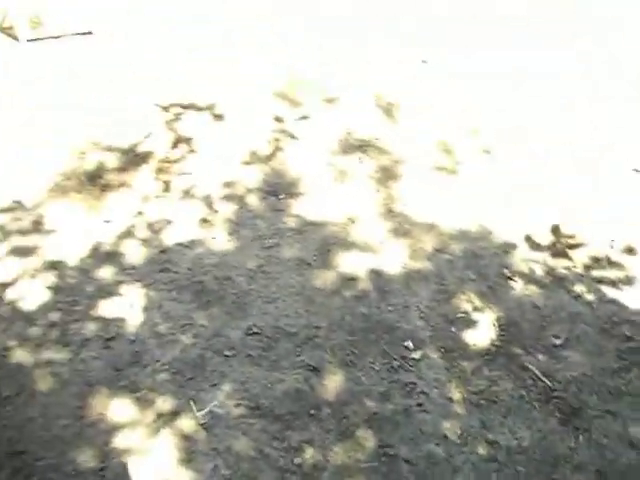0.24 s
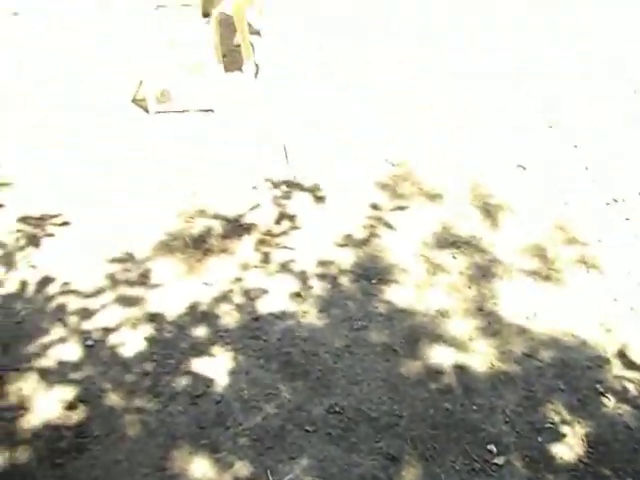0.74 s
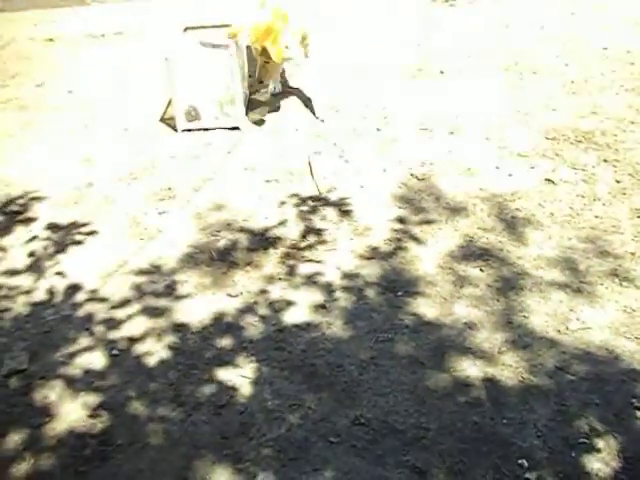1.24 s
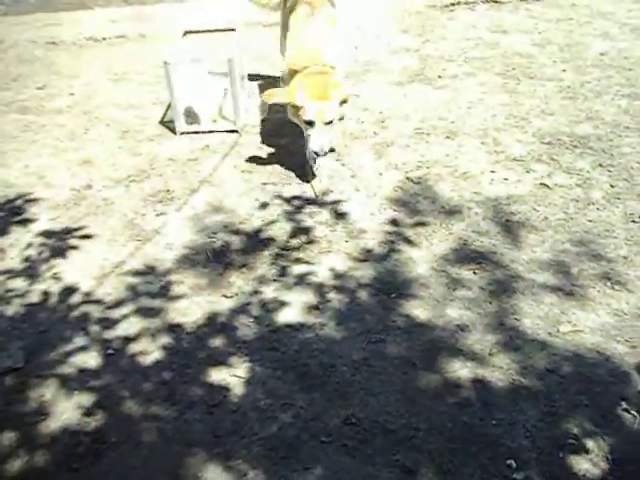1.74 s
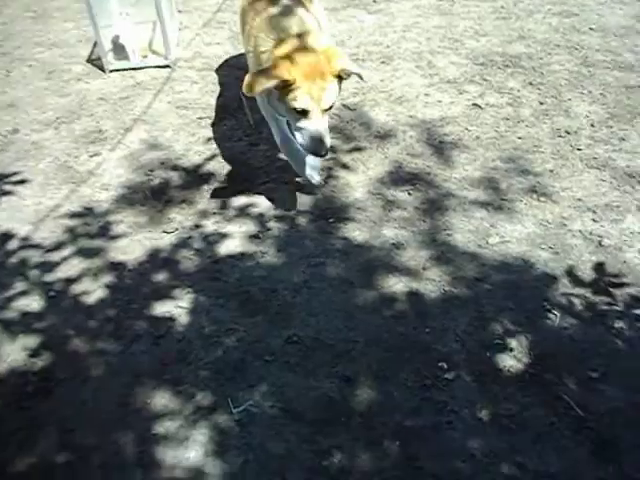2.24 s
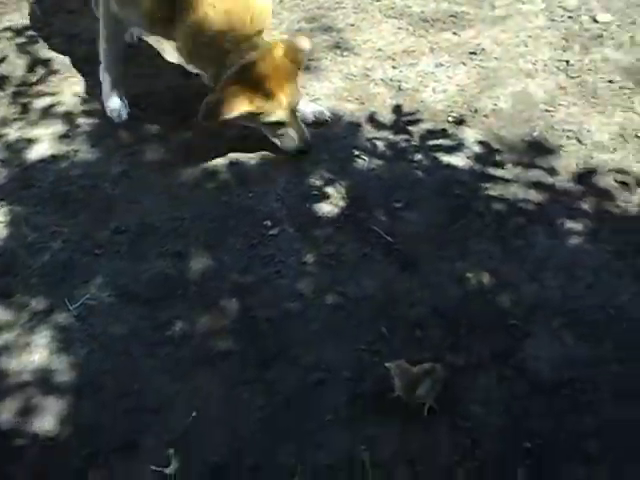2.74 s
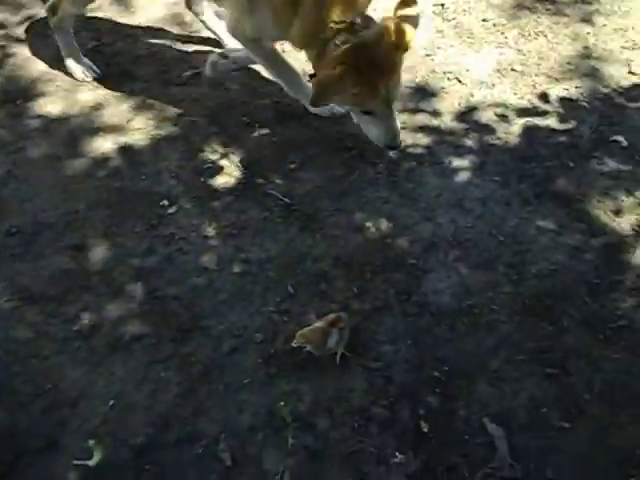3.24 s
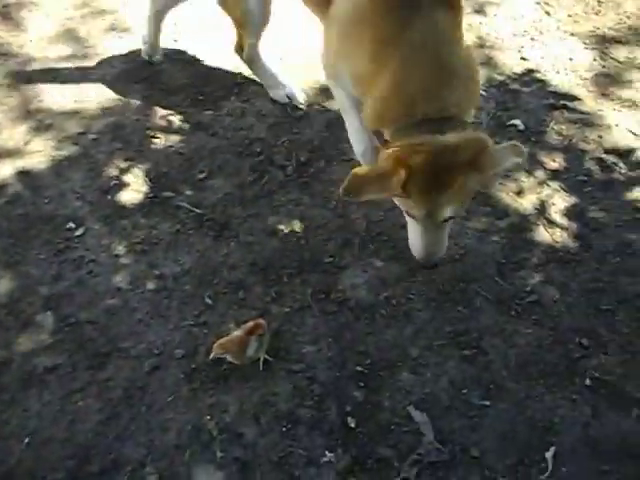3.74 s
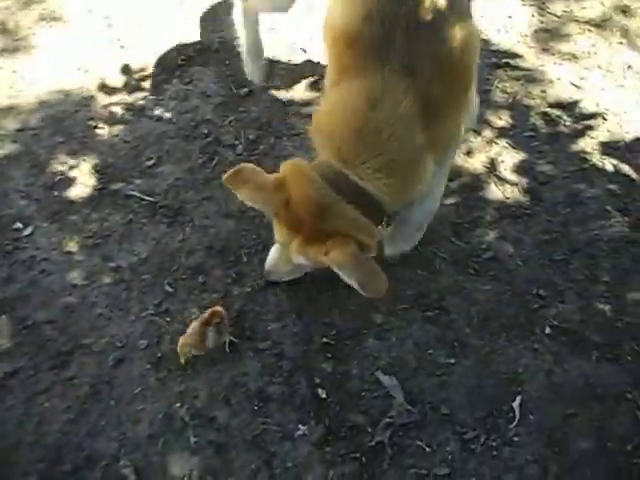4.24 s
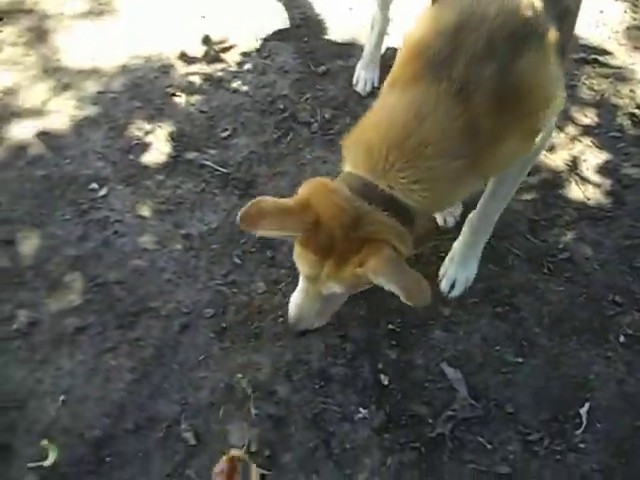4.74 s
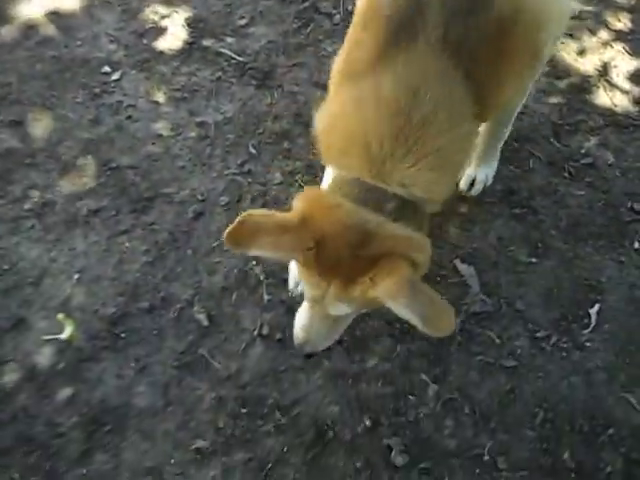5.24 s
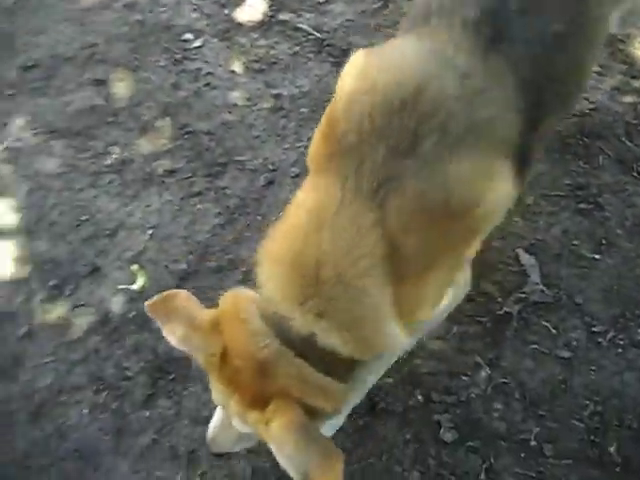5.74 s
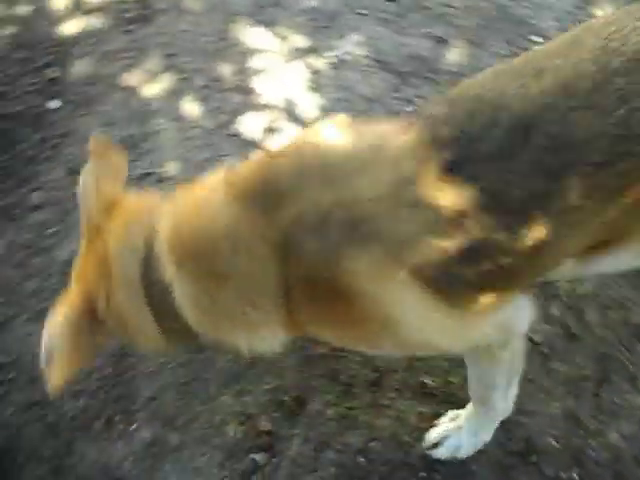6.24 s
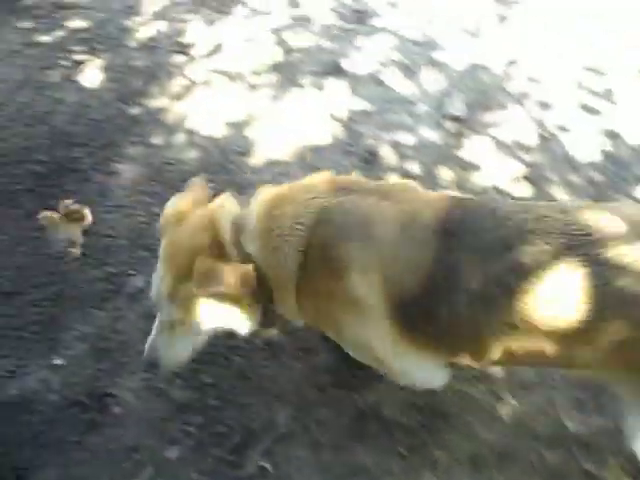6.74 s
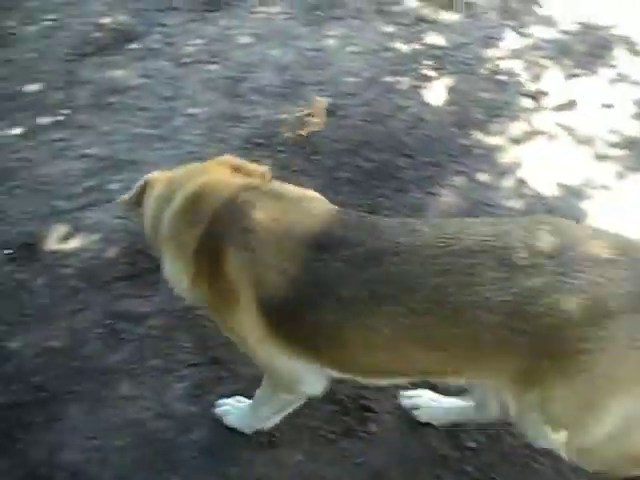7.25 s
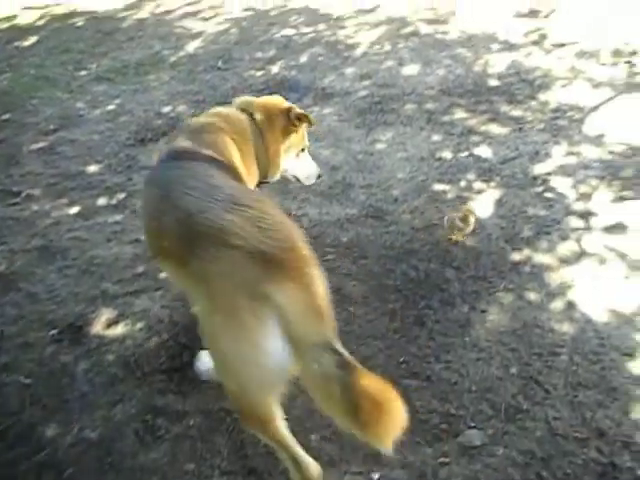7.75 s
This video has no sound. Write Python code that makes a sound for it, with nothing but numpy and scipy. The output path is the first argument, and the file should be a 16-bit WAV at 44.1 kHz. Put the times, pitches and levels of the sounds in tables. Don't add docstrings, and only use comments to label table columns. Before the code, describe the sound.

Piercing falling chick peeps in an open yard, overloaded at their loudest, with breathy hiss, leaf rustles and increasingly heavy wind buffeting.

```python
import sys
import numpy as np
from scipy import signal
from scipy.fft import rfft, irfft
from scipy.io import wavfile
from scipy.ndimage import uniform_filter1d

SR = 44100
rng = np.random.default_rng(int(sys.argv[2]) if len(sys.argv) > 2 else 0)


def output_pcm(signal):
    pcm = np.clip(np.atleast_2d(signal).T, -1, 1) * 32767
    wavfile.write(sys.argv[1], SR, np.round(pcm).astype(np.int16))


def voltage_ratio(decibels):
    exponent = np.asarray(decibels, float) / 20
    return 10 ** exponent


N = 352359


def evened(x):
    return x / np.sqrt(np.mean(x ** 2) + 1e-20)


def read(points, hz):
    f, value = np.transpose(points)
    return np.interp(np.log(hz + 1), np.log(f + 1), value)


def add(mix, s, sound):
    part = mix[round(s * SR):][:len(sound)]
    part += sound[:len(part)]


def follow(points):
    return np.interp(np.arange(N) / SR, *np.transpose(points))


def noise(spectrum, size, patchy_db):
    hz = np.fft.rfftfreq(size, 1 / SR)
    a, b, patches = rng.standard_normal((4 * N // size + 5, len(hz), 3)).T
    patches = uniform_filter1d(patches, size=9, axis=0)
    patches = evened(uniform_filter1d(patches, size=9, axis=1))
    z = (a + 1j * b) * voltage_ratio(read(spectrum, hz)[:, None] + patchy_db * patches)
    return evened(signal.istft(z, nperseg=size, noverlap=3 * size // 4)[1][:N])


def yard(x):
    # f/Hz, reverberation time/s
    decay_times = [(2000, 0.21), (3500, 0.33), (5000, 0.13), (8000, 0.27)]
    taps = np.zeros(SR // 2)
    at = np.arange(300, len(taps) - 20, 20)
    taps[at + rng.integers(0, 20, len(at))] = rng.choice([-1., 1.], len(at))
    hz, t, z = signal.stft(taps, SR, nperseg=256)
    decay = voltage_ratio(-60 * t / read(decay_times, hz)[:, None])
    tail = signal.istft(z * decay, SR, nperseg=256)[1]
    return signal.fftconvolve(x, tail / np.linalg.norm(tail))[:N]


def scatter(x):
    t = np.arange(3500) / SR
    dull = signal.lfilter([1], [1, -.45], rng.standard_normal(len(t)))
    taps = dull * voltage_ratio(-60 * t / 0.16) * np.clip(t / .011 - .5, 0, 1) ** 2
    return signal.oaconvolve(x, taps / np.linalg.norm(taps))[:N]


def hiss():
    # f/Hz, level per Hz/dB
    floor_spectrum = [(88, -54), (150, -25.5), (197, -9.5), (363, -13), (998, -15.5), (1840, -22),
                      (2840, -21), (3790, -11), (4630, -18), (5250, -13), (11200, -35), (14600, -75),
                      (22000, -120)]
    return voltage_ratio(-50) * noise(floor_spectrum, size=1024, patchy_db=1.5)


def brood():
    # t/s, level/dB
    murmur = [(0, -38), (.35, -67), (.7, -48), (1.0, -45.5), (1.5, -44), (1.95, -40.5), (2.3, -49.5),
              (2.65, -59), (3.03, -61), (3.4, -51), (3.83, -58), (4.1, -46.5), (4.5, -48.5), (5.2, -45),
              (6, -49.5), (7, -40.5), (7.99, -47.5)]
    out, t = np.zeros(N), np.linspace(0, 1, num=6000)
    for s, pitch, size in rng.random((800, 3)):
        hz = (4300 + 1500 * pitch) * (1 - 0.49 * t ** 2.3)
        peep = np.sin(2 * np.pi * np.cumsum(hz) / SR) * np.sin(np.pi * t)
        add(out, s * N / SR, voltage_ratio(5 * size) * peep)
    return voltage_ratio(follow(murmur)) * evened(yard(out))


def insect():
    # f/Hz, level/dB
    thin_tones = [
        (10790, -62),
        (11215, -82),
    ]
    t = np.arange(N) / SR
    dashes = uniform_filter1d((t * 30.5 % 1 < .6) * 1., size=120)
    return dashes * sum(voltage_ratio(db) * np.sin(2 * np.pi * hz * t) for hz, db in thin_tones)


def rustle():
    # t/s,
    # length/s, level/dB
    stirs = [(.55, 0.2, -59), (0.725, 0.11, -41), (0.838, 0.05, -39), (1.206, 0.55, -52.5),
             (1.86, 0.13, -51), (2.328, .1, -58), (2.718, .08, -54), (3.093, 0.12, -57),
             (3.528, 0.088, -60), (5.523, 0.11, -60), (4.013, 0.21, -52), (4.292, 0.055, -46),
             (4.863, 0.028, -51.5), (6.297, 0.32, -42.5), (6.487, 0.091, -34), (6.68, 0.55, -42)]
    # f/Hz, level/dB
    leaves = [(2500, -19), (4000, -14.5), (6300, -0.5), (7200, -13), (10000, -19.5), (11500, -33)]
    t, level = np.arange(N) / SR, np.zeros(N)
    for s, length, db in stirs:
        u = np.maximum(t - s, 0) / length
        level += voltage_ratio(db) * np.minimum(u / 0.12, 1) * np.exp(-u ** 2)
    crackle = evened(uniform_filter1d(rng.standard_normal(N), size=200))
    return level * voltage_ratio(2.5 * crackle) * noise(leaves, size=256, patchy_db=3.0)


def gusts():
    # centre t/s, half width/s, rumble level/dB, flutter over rumble/dB
    gust_rows = [(0.161, 0.61, -27.5, -30), (.64, 0.088, -13.5, -28), (0.992, 0.037, -5, -26),
                 (1.278, 0.12, -16, -24), (1.48, 0.063, -18, -23), (1.7, 0.096, -14.5, -27),
                 (2.0, 0.18, -28.5, -21), (2.65, 0.4, -29, -28), (3.08, 0.098, -22, -18.5),
                 (3.25, 0.053, -20.5, -19), (3.62, 0.23, -26, -25), (4.55, 0.081, -28, -27),
                 (4.781, 0.11, -20, -24.5), (5.222, 0.018, -17, -30), (5.33, 0.11, -16.5, -22.5),
                 (5.538, 0.072, -14, -22), (6.07, 0.036, -14.5, -30), (6.226, 0.031, -9.5, -16),
                 (6.412, 0.078, -11.5, -19.5), (6.648, 0.029, -13.5, -5.5), (6.732, 0.02, -1, -4.5),
                 (6.871, 0.099, -9, -5.5), (7.028, 0.094, -4, 4), (7.2, 0.075, -7, -3),
                 (7.352, 0.029, -12.5, 1), (7.477, 0.065, -8.5, -5.5), (7.97, 0.11, -23, -38)]
    calm_db, calm_flutter_db = -37.5, -57.5
    t = np.arange(0, N, 100) / SR
    s, width, db, over_db = np.transpose(gust_rows)[:, :, None]
    bell = np.exp(-((t - s) / width) ** 2)
    gains = []
    for rest_db, level_db in [(calm_db, db), (calm_flutter_db, db + over_db)]:
        power = voltage_ratio(2 * rest_db) + (voltage_ratio(2 * level_db) * bell).sum(axis=0)
        gains.append(np.interp(np.arange(N) / SR, t, np.sqrt(power)))
    return gains


def wind():
    # f/Hz, level/dB
    rumble_spectrum = [(12, 6.5), (25, 10), (45, 0.5), (80, -9), (120, -18.5), (200, -50.5), (350, -100)]
    # f/Hz, level/dB
    flutter_spectrum = [(50, -7), (100, 2.5), (220, -5.5), (350, -15.5), (600, -27), (1000, -40.5),
                        (2500, -77)]
    # t/s, signed push, length/s
    pushes = [(0.979, -1.1, 0.0095), (1.688, 1, 0.0026), (3.579, 0.45, 0.003), (5.241, 0.36, 0.005),
              (6.353, 1.14, 0.0032), (4.743, 0.22, 0.0016), (5.548, 0.4, 0.0014), (6.236, 0.1, 0.0027),
              (6.19, 1.1, 0.002), (6.713, 0.5, 0.0069), (6.987, -2, 0.00213), (7.024, 4, 0.0017),
              (7.106, 1.95, 0.0005), (7.459, 1.2, 0.0019), (7.476, -1.16, 0.0009)]
    flat_at = 2.6
    lumps = uniform_filter1d(rng.standard_normal(N), size=700)
    lumps = evened(uniform_filter1d(lumps, size=700))
    rumble = evened(noise(rumble_spectrum, size=4096, patchy_db=0.5) * voltage_ratio(3.55 * lumps))
    hits = rng.standard_normal(N) * (rng.random(N) < 260 / SR) * voltage_ratio(4.1 * lumps)
    thumps = irfft(rfft(hits) * voltage_ratio(read(flutter_spectrum, np.fft.rfftfreq(N, 1 / SR))), N)
    flutter = evened(evened(thumps) + 0.33 * noise(flutter_spectrum, size=1024, patchy_db=2.0))
    low, high = gusts()
    out = flat_at * np.tanh((low * rumble + high * flutter) / flat_at)
    t = np.arange(N) / SR
    for s, push, length in pushes:
        u = ((t - s) / length) ** 2
        out = out * (1 - np.exp(-u / 8)) + push * (1 - u / 4) * np.exp(-u / 2)
    return out


def knocks():
    # t/s, f/Hz, level/dB
    hollow_knocks = [
        (1.201, 438, -31),
        (3.316, 756, -29.5),
    ]
    out, t = np.zeros(N), np.arange(2000) / SR
    for s, hz, db in hollow_knocks:
        ring = voltage_ratio(db - 60 * t / 0.062) * np.sin(2 * np.pi * hz * t)
        add(out, s, ring * np.minimum(t / 0.00046, 1))
    return out


def ticks():
    # t/s, level/dB
    clicks = [(0.8069, -30.5), (0.815, -37), (0.8744, -48), (1.005, -34), (1.685, -63), (2.489, -30),
              (4.198, -34), (4.636, -41), (5.3297, -38), (5.5535, -43), (4.9247, -42), (6.2325, -37),
              (6.4533, -30), (6.672, -34), (7.577, -40), (6.7476, -32), (6.79, -30), (6.803, -37),
              (6.8848, -38), (6.9019, -25), (6.9335, -35), (6.9652, -30), (7.0085, -40), (7.052, -27.5),
              (7.1373, -25.5), (7.457, -36), (7.507, -45)]
    fast_s, slow_s, edge_db = .00004, 0.00012, -14.5
    out, t = np.zeros(N), np.arange(200) / SR
    dull_push = np.exp(-t / slow_s) * (1 - t / slow_s)
    shape = dull_push + voltage_ratio(edge_db) * np.exp(-t / fast_s)
    for s, db in clicks:
        add(out, s, voltage_ratio(db + 15.5) * shape)
    return out


def far_peeps():
    # t/s, f/Hz, level/dB
    early = [
        [(.121, 4750, -39), (.183, 4210, -29.5), (.196, 4150, -19.5), (.215, 3200, -32), (.225, 2720, -43),
         (.25, 1980, -47)],
        [(.398, 4560, -33), (.43, 4730, -47), (.495, 4450, -32.5), (.525, 3970, -21), (.542, 3520, -23),
         (.55, 2780, -38.5), (.568, 1990, -54)],
        [(.75, 4880, -28.5), (.8, 4400, -21), (.822, 4166, -30), (.842, 4410, -25.5), (.865, 4060, -20),
         (.873, 3920, -11), (.885, 3170, -31.5), (.892, 2970, -27.5), (.917, 1920, -53)],
        [(1.105, 4880, -33.5), (1.135, 4490, -32.5), (1.18, 4130, -25), (1.205, 3990, -19), (1.224, 3520, -25),
         (1.232, 2720, -43.5), (1.256, 1940, -41)],
        [(1.548, 4700, -45), (1.565, 4610, -28.5), (1.6, 4380, -42), (1.645, 4030, -16.5), (1.68, 3530, -36.5),
         (1.688, 2730, -44), (1.71, 2170, -40)],
    ]
    # t/s, f/Hz, level/dB
    late = [
        [(1.967, 4740, -40), (2.01, 4560, -35), (2.06, 4015, -20), (2.091, 3720, -29), (2.105, 2580, -40),
         (2.127, 2200, -37)],
        [(2.336, 4650, -47), (2.385, 4450, -41), (2.42, 4230, -31), (2.43, 3720, -23), (2.458, 3660, -13),
         (2.468, 2830, -39), (2.483, 2260, -28)],
        [(2.716, 4760, -44), (2.76, 4500, -41), (2.797, 4100, -33), (2.83, 3650, -22), (2.85, 2700, -42)],
        [(3.076, 4690, -48), (3.115, 4690, -42.5), (3.155, 4170, -38.5), (3.185, 3770, -22.5), (3.2, 3370, -36),
         (3.215, 2410, -35)],
        [(3.436, 4720, -46), (3.47, 4840, -39), (3.505, 4270, -45.5), (3.535, 3980, -32), (3.557, 3640, -30.5),
         (3.568, 2850, -43), (3.6, 2220, -49)],
        [(3.882, 4640, -46), (3.93, 4590, -39), (3.96, 4250, -43), (4.008, 3560, -25), (4.018, 3280, -40),
         (4.03, 2520, -46.5), (4.05, 2080, -46)],
    ]
    # start t/s, end t/s, from f/Hz, to f/Hz, level/dB
    faint = [
        (.166, 0.17, 7500, 3100, -48),
        (.615, .652, 4450, 4000, -45.5),
        (1.06, 1.106, 3800, 3050, -43.5),
        (1.525, 1.58, 4000, 3200, -36),
        (1.232, 1.278, 3600, 3200, -47),
        (2.522, 2.54, 4500, 4400, -33),
        (3.4, 3.435, 3800, 2600, -52),
        (3.57, 3.6, 5300, 4350, -41),
        (.44, .48, 3300, 3200, -52),
        (4.425, 4.47, 4200, 3300, -42.5),
    ]
    scraps = [[(start, from_hz, db), (end, to_hz, db)] for start, end, from_hz, to_hz, db in faint]
    return sorted(scraps + early + late)


def controls(rows):
    s, *columns = np.transpose(rows)
    t = np.arange(s[0], s[-1], 1 / SR)
    return t, *(uniform_filter1d(np.interp(t, s, c), size=90, mode="nearest") for c in columns)


def far_chicks():
    # f/Hz, level over the tone/dB
    far_octave = [(4500, 12), (6000, -1.5), (8000, -29), (9500, -29.5)]
    # f/Hz, level/dB
    second_voice = [(3900, -47.5), (4350, -4.5), (4800, -5.5)]
    gap_hz, closes_hz_per_s = 700, 3000
    out = np.zeros(N)
    chance = uniform_filter1d(rng.standard_normal((60, 12000)), size=100)
    chance = uniform_filter1d(chance, size=40)
    for k, rows in enumerate(far_peeps()):
        t, hz, tone_db = controls(rows)
        hz = uniform_filter1d(hz, size=250, mode="nearest")
        quiver = evened(np.roll(chance, 3 * k, axis=0)[:4, :len(t)])
        turn = 2 * np.pi * np.cumsum(hz * (1 + .006 * quiver[0])) / SR
        twin_hz = hz + gap_hz - closes_hz_per_s * (t - t[0]) + 40 * quiver[1]
        twin = 2 * np.pi * np.cumsum(twin_hz) / SR
        tone = np.sin(turn) + voltage_ratio(read(far_octave, 2 * hz)) * np.sin(2 * turn)
        tone = voltage_ratio(2.28 * quiver[2]) * tone
        tone += voltage_ratio(read(second_voice, hz) + 3 * quiver[3]) * np.sin(twin)
        add(out, t[0], np.sqrt(2) * voltage_ratio(tone_db) * tone * signal.windows.tukey(len(t), .15))
    add(out, .018, voltage_ratio(-15) * out.copy())
    return out


def rattle():
    # start t/s, end t/s, slap rate f/Hz
    rattles = [(.2, .222, 235), (1.69, 1.712, 235), (2.05, 2.075, 235), (2.41, 2.43, 260),
               (2.775, 2.795, 260), (3.165, 3.192, 235), (3.609, 3.636, 235), (4.549, 4.563, 235),
               (5.728, 5.737, 235), (5.781, 5.787, 235), (6.069, 6.088, 205), (6.386, 6.416, 235),
               (6.714, 6.739, 410), (6.773, 6.792, 330), (7.09, 7.143, 480), (7.553, 7.578, 240),
               (7.97, 7.99, 235)]
    t, out = np.arange(N) / SR, np.zeros((2, N))
    wobble = evened(uniform_filter1d(rng.standard_normal(N), size=300))
    for start, end, rate in rattles:
        now = (t >= start) & (t < end)
        phase = np.cumsum(rate * voltage_ratio(1.8 * wobble[now])) / SR % 1
        out[0, now] = .9 * phase * np.minimum((end - t[now]) / .004, 1)
        out[1, now] = rate
    return uniform_filter1d(out, size=38)


def near_peeps():
    # start t/s, break t/s, end t/s, opening f/Hz, effort/dB
    shrill = [
        (.202, .243, .351, 5697, 0.5),
        (1.685, 1.708, 1.828, 5410, 0.5),
        (2.05, 2.083, 2.197, 5380, 0.5),
        (2.402, 2.441, 2.556, 5280, 3),
        (2.772, 2.816, 2.921, 5505, 2.5),
        (3.162, 3.207, 3.311, 5610, -0.5),
        (3.603, 3.649, 3.756, 5590, 3),
    ]
    held = [
        (4.137, 4.178, 4.258, 4947, -6.5),
        (4.529, 4.58, 4.664, 5140, 1),
        (4.899, 4.958, 5.043, 5064, -2.5),
        (5.278, 5.336, 5.416, 5118, -1),
        (6.046, 6.124, 6.2, 5077, -1.5),
        (7.947, 8.0, 8.07, 5130, -20),
    ]
    slurred = [
        (5.69, 5.761, 5.851, 5210, 1),
        (7.527, 7.615, 7.685, 5074, 0.25),
    ]
    warbled = [
        (6.374, 6.455, 6.52, 5065, -2),
        (6.7, 6.82, 6.886, 5396, -0.5),
        (7.092, 7.208, 7.265, 5310, -3.5),
    ]
    # f before the break/Hz, f after it/Hz, break/s, hold of the opening (exponent), attack/s
    shrill_way = (4750, 3880, .016, 0.81, 0.0032)
    held_way = (4720, 3860, 0.014, 2.3, 0.0064)
    slurred_way = (4550, 4045, 0.018, 2, 0.012)
    warbled_way = (4780, 3900, 0.016, 5.5, 0.0088)
    # t before the end/s, f/Hz
    shrill_slide = [(0.049, 3285), (0.027, 2885), (0.015, 2450), (0.0012, 1790)]
    held_slide = [(0.048, 3380), (0.033, 3063), (0.016, 2550), (0.003, 1910)]
    slurred_slide = [(.036, 3300), (.021, 2900), (.012, 2480), (0, 1800)]
    warbled_slide = [(0.038, 3480), (0.019, 2980), (0.0045, 2540), (0.0018, 2200)]
    # f/Hz, level/dB
    shrill_beak = [(1800, -35.5), (2400, -17), (3050, -10), (3400, -1.5), (3800, 1), (4200, 3),
                   (4600, -15.5), (5500, -18.5)]
    held_beak = [(1800, -22.5), (2300, -21.5), (3000, -8.5), (3600, 5), (3900, -0.5), (4400, -7),
                 (4750, 0.5), (5300, -14)]
    slurred_beak = [(1800, -37.5), (2200, -25.5), (2700, -14.5), (3350, -9), (3900, -11), (4300, 3),
                    (4600, 3), (5100, -10)]
    warbled_beak = [(2200, -12), (2600, -20.5), (3000, -3), (3600, 4.5), (3900, -0.5), (4400, -2.5),
                    (4750, -8), (5500, -9.5)]
    # f/Hz, width/Hz, depth/dB
    notches = [
        (3200, 65, 15),
        (2770, 70, 10),
    ]
    # centre
    # t/s, half width/s, f/Hz, level/dB
    wavers = [(1.714, 0.0051, -150, -17), (1.782, 0.053, 10, 3.5), (2.064, .008, 147.5, -3),
              (2.4, 0.0147, -250, -6), (2.42, 0.01213, 202, 1), (2.428, 0.00452, -250, -4),
              (2.446, 0.00567, 203.5, 2), (2.451, 0.0055, -250, -2.5), (2.794, .005, -250, -9),
              (2.819, .006, -250, -1.5), (3.606, 0.0081, -61.5, -10), (4.184, 0.0049, -200, 4),
              (4.59, 0.0011, 14, -12), (5.346, 0.0021, 7, -12), (2.811, 0.01, 200.5, 3.5),
              (3.194, 0.0051, -150, -16), (3.638, 0.0041, -39, -14), (4.139, 0.0144, 99, -5),
              (4.202, .008, -150, 5), (4.235, 0.017, 7, 15), (5.287, 0.015, -44.5, 3.5),
              (5.696, .015, -120, -10), (5.748, 0.017, -4, -10.5), (5.791, 0.0089, -3, 5.5),
              (6.049, 0.017, -54, -11.5), (6.143, 0.0056, 0, -18.5), (6.132, 0.007, 251.5, 0),
              (4.586, 0.00725, 253.5, -6.5), (4.972, 0.011, 151, -3), (4.628, 0.0058, 54, 3.5),
              (4.569, 0.02, 1, -5), (6.407, 0.0171, -76, 4.5), (6.449, 0.015, 311, 7.5),
              (6.376, .004, -250, -2), (1.694, 0.009, 4, -10), (6.698, 0.0074, -700, 21),
              (6.764, 0.016, 215, 1.5), (6.806, 0.014, -330, 3.5), (4.96, 0.0037, 7, -10),
              (6.754, 0.0068, 3, 5.5), (7.1, 0.018, 98.5, -4.5), (7.122, 0.011, -200, -5.5),
              (7.165, 0.014, 249, 2.5), (7.189, 0.01033, -220, 0), (7.251, 0.0072, -92, 0),
              (7.6, 0.011, -74, -4.5), (7.623, 0.005, 149, -14.5), (7.634, 0.006, 15, -12.5),
              (.282, .035, -110, .5),
        (2.833, .014, 140, .5),
        (7.216, .004, 5, -9),
        (6.731, .009, -160, -1.5),
        (6.785, .007, -150, -5),
        (3.703, .003, 5, -11),
        (3.712, .004, 5, 9),
        (4.638, .003, 5, -9),
        (6.124, .008, 5, -3),
    ]
    # break t/s, half width/s, f/Hz
    snaps = [
        (.25, 0.0056, 99),
        (2.09, 0.0059, 100.7),
        (3.655, 0.0055, 120),
        (6.462, 0.0034, 278),
        (7.218, 0.0056, 120),
        (7.633, .005, 220),
        (6.829, .007, 150),
    ]
    manners = [(shrill, shrill_way, shrill_slide, shrill_beak, 1),
               (held, held_way, held_slide, held_beak, .4),
               (slurred, slurred_way, slurred_slide, slurred_beak, 0),
               (warbled, warbled_way, warbled_slide, warbled_beak, 0)]
    for peeps, way, slide, beak, echo in manners:
        knee_hz, low_hz, break_s, hold, attack_s = way
        before, slide_hz = np.transpose(slide)
        for start, snap, end, top_hz, effort_db in peeps:
            t = np.arange(start, end, 1 / SR)
            s, width, *sizes = np.transpose(wavers)[:, :, None]
            bend_hz, accent_db = (sizes * np.exp(-((t - s) / width) ** 2)).sum(axis=1)
            s, width, swing_hz = np.transpose(snaps)[:, :, None]
            u = (t - s) / width
            bend_hz = bend_hz - (2 * swing_hz * u * np.exp(-u ** 2)).sum(axis=0)
            high = top_hz - (top_hz - knee_hz) * ((t - start) / (snap - start)) ** hold
            corners = np.maximum.accumulate([snap, snap + break_s, *(end - before)])
            low = np.interp(t, corners, [knee_hz, low_hz, *slide_hz])
            hz = np.where(t < snap, high, low) + bend_hz
            hz = uniform_filter1d(hz, size=90, mode="nearest")
            lost_db = echo * sum(db * np.exp(-((hz - f) / wide) ** 2) for f, wide, db in notches)
            attack_db = 21.5 * np.exp(-(t - start) / attack_s)
            yield t, hz, effort_db + read(beak, hz) + accent_db - lost_db - attack_db


def near_chick():
    # f/Hz, level/dB
    octave = [(3600, -63.5), (4800, -31), (6400, -14.5), (7400, -24), (8200, -30), (9600, -21),
              (10200, -32.5), (10900, -48.5)]
    # f/Hz, level/dB
    third = [(4500, -38), (6500, -4.5), (9000, -7), (10500, -7.5), (12000, -43)]
    # t/s, level/dB
    facing = [(.28, -2), (1.76, -3.5), (2.13, -3), (2.48, 2), (2.85, 4), (3.24, .5), (3.69, 5), (4.2, 1),
              (4.6, 3.5), (4.97, -2.5), (5.35, -1.5), (5.77, 1), (6.13, 0.5), (6.45, -3), (6.8, 4.5),
              (7.2, 4.5), (7.6, -3.5)]
    # f/Hz, width/Hz, depth/dB
    octave_dip = (6810, 82, 15.3)
    dip_hz, width, depth_db = octave_dip
    out, (ramp, rate) = np.zeros(N), rattle()
    quiver = evened(uniform_filter1d(rng.standard_normal(N), size=60))
    flicker = evened(uniform_filter1d(quiver, size=350))
    for t, hz, tone_db in near_peeps():
        at = np.minimum((t * SR).astype(int), N - 1)
        sag, rough = ramp[at], uniform_filter1d((ramp[at] > .01) * 1., size=130)
        jolt = rate[at] / 2000 * ((1 - sag) ** 2 - .42)
        hz = hz * (1 + rough * (jolt + .01 * quiver[at]))
        turn = 2 * np.pi * np.cumsum(hz) / SR
        dull_db = 2.07 * min(t[0], 7.5) * np.clip((hz - 2600) / 1800, .3, 1)
        octave_db = read(octave, 2 * hz) + 0.14 * tone_db + 3.5 - dull_db
        octave_db = octave_db + 1.6 * flicker[at] + np.interp(t, *np.transpose(facing))
        octave_db = octave_db - depth_db * np.exp(-((2 * hz - dip_hz) / width) ** 2) - 6 * rough
        third_db = octave_db + read(third, 3 * hz) - 1.66 * t[0]
        tone = voltage_ratio(tone_db) * np.sin(turn) + voltage_ratio(octave_db) * np.sin(2 * turn)
        tone += voltage_ratio(third_db) * np.sin(3 * turn)
        tone = tone * (1 + 0.12 * rough) * (1 - sag)
        add(out, t[0], np.sqrt(2) * tone * signal.windows.tukey(len(t), .07))
    return out


def wall_slap(near):
    # t/s, level/dB
    slap = [
        (0, -32.5),
        (6.8, -15),
        (7.2, -9),
        (7.5, -14),
    ]
    thin = uniform_filter1d(np.diff(near, prepend=0), size=4)
    out = np.zeros(N)
    add(out, .024, thin * voltage_ratio(follow(slap)))
    return out


def scene():
    floor = hiss() + brood() + insect() + rustle()
    far, near = far_chicks(), near_chick()
    near = near + wall_slap(near)
    early = scatter(voltage_ratio(-23.5) * near + voltage_ratio(-13.5) * far)
    late = yard(voltage_ratio(-26.0) * near + voltage_ratio(-22.5) * far)
    chicks = near + far + early + late
    return (chicks + wind() + knocks() + ticks() + floor)[None]


def level_control():
    # first t/s, number of steps, t between steps/s
    runs = [(.2477, 4, .0043), (.9688, 2, .0041), (1.6852, 1, 0), (1.7173, 4, .0042), (2.09, 4, .0042),
            (2.438, 5, .0047), (2.8077, 1, 0), (2.82, 5, .0041), (3.2146, 4, .0041), (3.6515, 5, .0043),
            (4.1638, 5, .0105), (4.5544, 2, .018), (4.5943, 3, .0047), (4.9283, 3, .0096),
            (5.2895, 3, .0043), (5.3524, 2, .0042), (5.7327, 1, 0), (5.7593, 3, .0041), (6.0761, 2, .0098),
            (6.1045, 1, 0), (6.3531, 1, 0), (6.3987, 4, .0246), (6.7116, 2, .0045), (6.7706, 1, 0),
            (6.8166, 2, .0216), (6.986, 2, .036), (7.1056, 1, 0), (7.2253, 2, .009), (7.4765, 1, 0),
            (7.5446, 1, 0), (7.5926, 2, .0117)]
    cut_db, climb_db, climb_s = 3, 1.5, .032
    t, gain_db, last_db = np.arange(N) / SR, np.zeros(N), 0
    cuts = [first + k * gap for first, steps, gap in runs for k in range(steps)]
    for start, end in zip(cuts, [*cuts[1:], N / SR]):
        now = slice(int(start * SR), int(end * SR))
        stairs = uniform_filter1d((t[now] - start) // climb_s, size=50, mode="nearest")
        gain_db[now] = np.minimum(last_db - cut_db + climb_db * stairs, 0)
        last_db = gain_db[now][-1]
    return voltage_ratio(gain_db)


def half_rate(x):
    x = signal.oaconvolve(x, signal.firwin(81, 10700, fs=SR), "same")
    mirror = x * np.cos(2 * np.pi * 11025 * 2 * np.arange(N) / SR)
    return x + voltage_ratio(-6.0) * signal.oaconvolve(mirror, signal.firwin(81, 11700, fs=SR), "same")


def band_limit(x):
    return signal.sosfilt(signal.butter(12, 16120, fs=SR, output="sos"), x)


def record(dry):
    x = np.clip(dry[0] * level_control(), -.74, .74)
    x = np.clip(half_rate(x), -.77, .77)
    return band_limit(x[None])


dry = scene()
out = record(dry)
output_pcm(out)
```